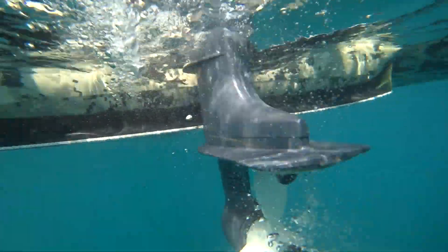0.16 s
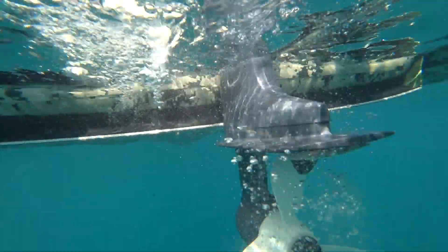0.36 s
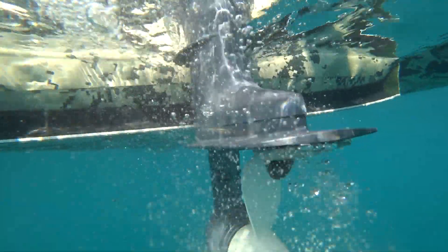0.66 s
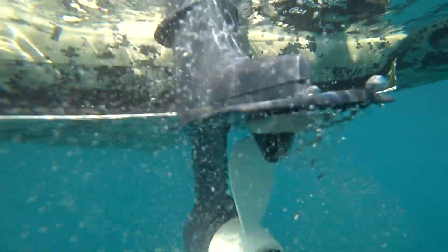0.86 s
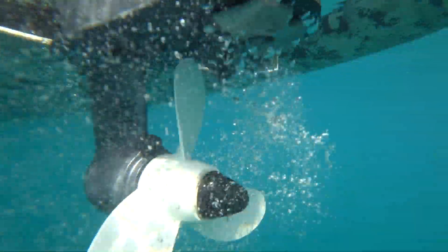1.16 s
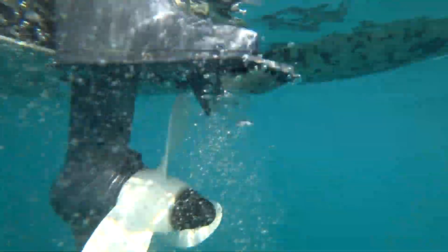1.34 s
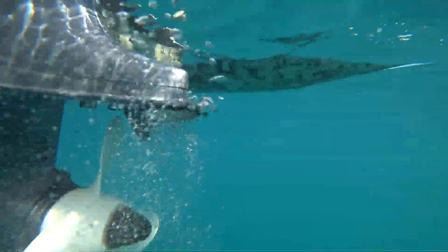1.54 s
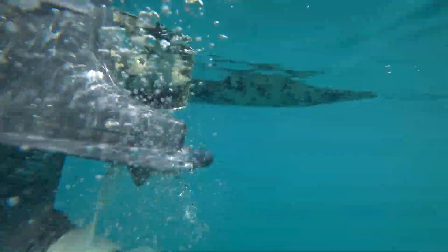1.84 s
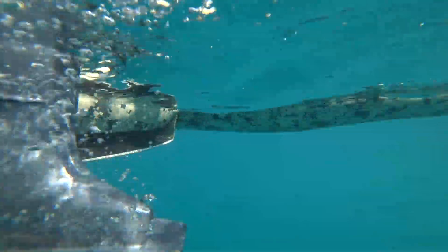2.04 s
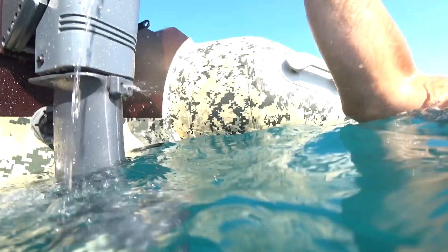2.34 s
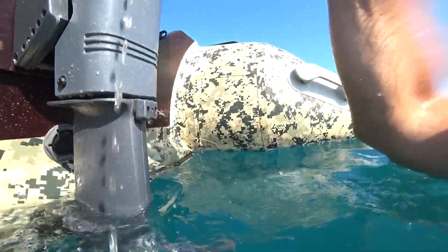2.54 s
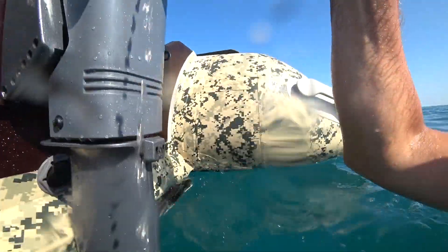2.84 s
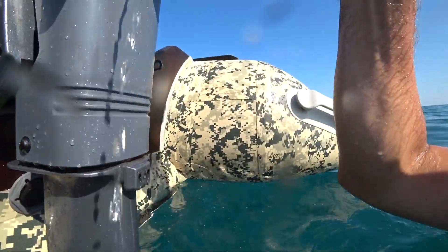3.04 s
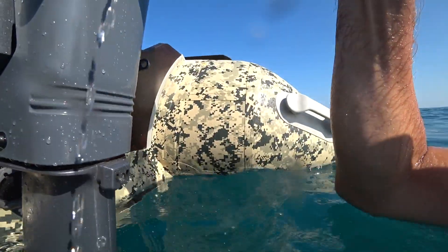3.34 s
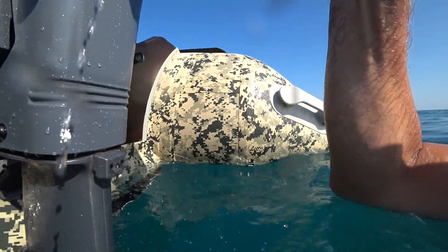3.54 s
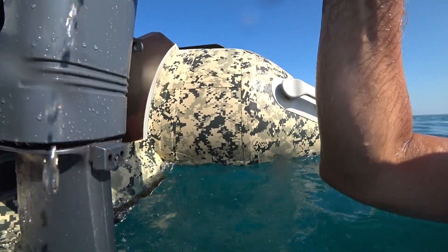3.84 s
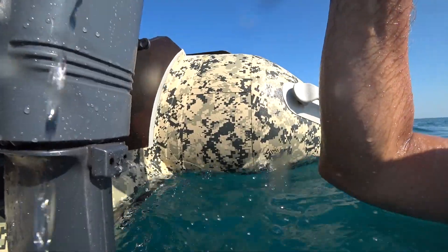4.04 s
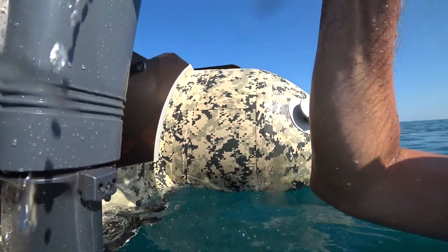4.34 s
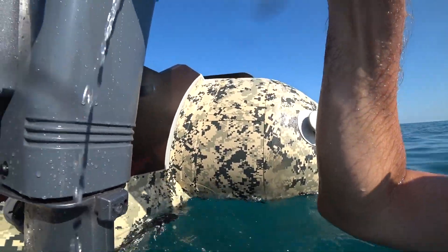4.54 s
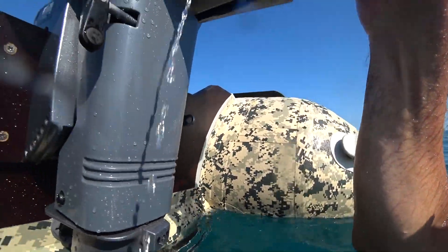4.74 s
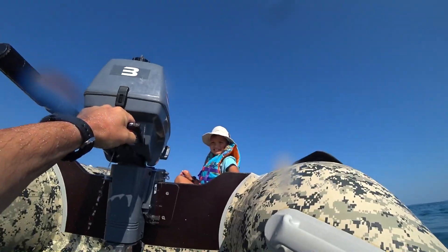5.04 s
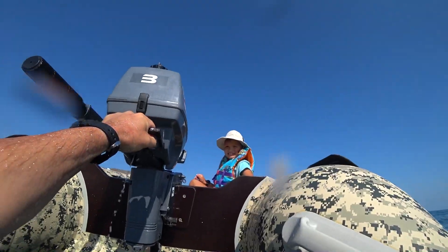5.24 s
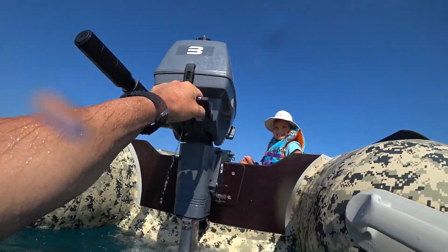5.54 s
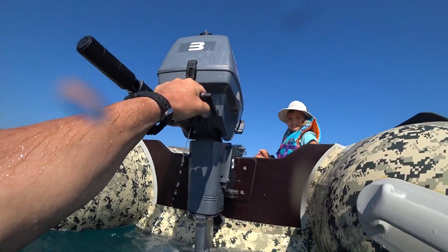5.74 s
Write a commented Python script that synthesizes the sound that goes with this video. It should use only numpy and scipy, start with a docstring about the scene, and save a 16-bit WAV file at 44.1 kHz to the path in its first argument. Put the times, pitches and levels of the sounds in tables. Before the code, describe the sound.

Close to a boat propeller at sea, the idling two-stroke blows loud, ringing, tonal bubbles about twenty times a second, with deep knocks, small ticks and close plips. After about two and a half seconds the microphone rises into open air, hearing crisp clattering metal, gurgling exhaust and light wind rumble. A water drop snaps on the housing just before the engine, now running faster, settles into a buzzing drone.

```python
"""Two-stroke outboard, from under water into the air

A small outboard idles on an inflatable boat, firing about every other turn of the crank. By the propeller
each exhaust puff bursts into ringing bubbles, built from rising sines, over a booming exhaust leg.
Then the microphone surfaces to the dry rattle of the engine, shaped noise pulsed by the firings, and to a
burble at the waterline. At the end the engine runs faster: a drone of crank harmonics, gulps and hiss."""
import sys
import numpy as np
from scipy import signal
from scipy.fft import rfft, irfft, next_fast_len
from scipy.io import wavfile
from scipy.ndimage import uniform_filter1d, map_coordinates

SR = 44100
rng = np.random.default_rng(int(sys.argv[2]) if len(sys.argv) > 2 else 0)


def pcm_store(signal):
    """Save signal as 16-bit PCM."""
    levels = np.round(np.clip(np.atleast_2d(signal), -1, 1) * 32767)
    wavfile.write(sys.argv[1], SR, levels.astype(np.int16).T)


N = 259295
TIME = np.arange(N) / SR
SURFACE_S, FASTER_S = 2.426, 4.8   # the microphone surfaces; the engine runs faster

# the two microphone ports: (f/Hz, left lead/rad, likeness 0-1, left minus right/dB)
PORTS = [(60, 0, .85, -3), (220, .25, .85, -5), (420, .5, .85, -4), (690, .95, .9, -3),
         (850, 1.4, .9, -1.5), (1100, 2.5, .92, 1.5), (3200, 2.7, .65, -.5), (5800, 2, .5, 0),
         (8200, .3, .4, 1.5), (15000, 0, .5, 2.5)]
# exhaust puffs under water, about one a turn: (t/s, length/s, bubble f/Hz, level before each layer's trim/dB)
PUFFS = [(0, 0.01, 555, -18.5), (0.04, 0.013, 936, -21.5), (0.126, 0.027, 743, -20.0),
         (0.207, 0.037, 724, -16.5), (0.257, 0.02, 810, -15.5), (0.315, 0.031, 632, -17),
         (0.366, 0.024, 636, -23), (0.423, 0.038, 625.5, -16.5), (0.469, 0.012, 819, -15.5),
         (0.526, 0.039, 647.5, -14.0), (0.566, 0.019, 799, -15.5), (0.628, 0.034, 613, -17),
         (0.733, 0.019, 925, -12), (0.776, 0.016, 1063, -17.5), (0.833, 0.032, 847, -15.0),
         (0.876, 0.012, 984, -15), (0.937, 0.022, 853, -13), (0.992, 0.016, 801, -12),
         (1.038, 0.031, 600, -11.5), (1.083, 0.013, 812, -14), (1.138, 0.045, 611, -19),
         (1.179, 0.022, 751, -13.5), (1.237, 0.035, 770, -14.5), (1.282, 0.027, 824, -15.5),
         (1.348, 0.031, 638, -15.5), (1.386, 0.0153, 600, -14), (1.441, 0.034, 826, -26),
         (1.494, 0.018, 486, -24), (1.549, 0.06, 816, -26), (1.652, 0.016, 473, -27.5),
         (1.711, 0.04, 480, -19), (1.757, 0.02, 485, -16.0), (1.82, 0.027, 727, -14),
         (1.866, 0.015, 501, -18.5), (1.916, 0.025, 618, -22.5), (1.964, 0.027, 1075, -29),
         (2.022, 0.021, 1050, -21.5), (2.073, 0.029, 695, -24.5), (2.141, 0.032, 876, -23),
         (2.184, 0.02, 662, -25.5), (2.245, 0.044, 902, -28.5), (2.291, 0.036, 985, -37),
         (2.354, 0.043, 957, -33)]
# exhaust welling up at the waterline as the boat rocks: (t/s, level before each layer's trim/dB)
WELLING = [(2.45, -53), (2.56, -34.5), (2.76, -37), (2.86, -43.5), (2.97, -37), (3.17, -30), (3.38, -39),
           (3.49, -49), (3.59, -38.5), (3.69, -37.5), (3.8, -25), (3.9, -34), (4.0, -24), (4.1, -33.5),
           (4.42, -24), (4.52, -32), (4.73, -35.5)]
# hollow colour of the engine and its cowl in air, before tilting: (f/Hz, relative level per Hz/dB)
ENGINE_COLOUR = [(600, 2), (790, -9.5), (1000, 4.5), (1400, -2), (1780, -15), (2020, -6.5), (2250, -15),
                 (2550, -11), (2860, -13.5), (3060, -13.5), (3270, -9.5), (3750, -21), (4200, -13),
                 (5200, -12.5), (7000, -19), (8700, -25.5), (13600, -25.5), (15500, -31)]


def from_db(db):
    """Decibels to gain."""
    return 10 ** (np.asarray(db) / 20)


def rms_one(x):
    """Scale to rms 1."""
    return x / np.sqrt(np.mean(x ** 2) + 1e-20)


def at_s(rows, s):
    """Each column of a curve at the given times."""
    points, *columns = np.transpose(rows)
    return [np.interp(s, points, c) for c in columns]


def in_time(rows):
    """Each column of a curve at every sample."""
    return at_s(rows, TIME)


def at_hz(rows, hz):
    """Each column of a spectrum at the given frequencies, read on a logarithmic scale."""
    points, *columns = np.transpose(rows)
    return [np.interp(np.log(hz + 1e-9), np.log(points), c) for c in columns]


def after(s, fade):
    """A smooth step from 0 to 1, centred on time s."""
    return .5 + .5 * np.tanh((TIME - s) / fade)


def add(out, s, sound):
    """Mix a short sound in at time s."""
    start = max(int(s * SR), 0)
    out[..., start:start + sound.shape[-1]] += sound[..., :N - start]


def low_pass(x, hz, order):
    """Butterworth low-pass."""
    return signal.sosfilt(signal.butter(order, hz, fs=SR, output="sos"), x + 1e-18)


def resonate(x, hz, width_hz):
    """A resonance with gain 1 on top."""
    return signal.lfilter(*signal.iirpeak(hz, hz / width_hz, fs=SR), x + 1e-18)


def with_modes(x, modes):
    """A sound together with the resonances that it excites."""
    return x + sum(from_db(db) * resonate(x, hz, width) for hz, width, db in modes)


def drift(rate):
    """Smooth random wander, some knots per second; rms 1."""
    knots = rng.standard_normal(4096)
    return rms_one(map_coordinates(knots, [TIME * rate], order=2, mode="wrap"))


def at_ports(hz):
    """Complex gain of the left and right port for sounds of these frequencies, each from its own direction."""
    lead, alike, balance_db = at_hz(PORTS, hz)
    scatter = np.sqrt(-2 * np.log(np.clip(alike, .05, 1)))   # less alike: directions spread wider
    lead = lead + scatter * rng.standard_normal(len(hz))
    left = from_db(balance_db / 2) * np.exp(.5j * lead)
    return np.array([left, 1 / left])


def noise(colour):
    """Stereo noise of the given spectrum, falling steeply beyond its ends; rms 1."""
    size = next_fast_len(N, real=True)
    hz = np.arange(size // 2 + 1) * SR / size + 1e-3
    skirts = np.minimum(hz / colour[0][0], 1) ** 4 * np.minimum(colour[-1][0] / hz, 1) ** 4
    gain = from_db(at_hz(colour, hz)[0]) * skirts
    spectrum = rfft(rng.standard_normal(size)) * gain * at_ports(hz)
    return rms_one(irfft(spectrum, size)[:, :N])


def tilted(colour, db_per_octave):
    """A spectrum made brighter or duller."""
    return [(hz, db + db_per_octave * np.log2(hz)) for hz, db in colour]


def wavering(hz, rate, steady, lead):
    """A resonance kept ringing by random pushes, with a steady share; left leads by some radians; rms 1."""
    swing = steady + drift(rate) + 1j * drift(rate)
    phase = 2 * np.pi * np.cumsum(hz * np.ones(N)) / SR
    port_phase = .5 * lead * np.array([[1], [-1]])
    return rms_one((swing * np.exp(1j * (phase + port_phase))).real)


def crank_angle():
    """Turns made by the idling crank so far: its speed summed over time."""
    # idle speed of the crank: (t/s, rate/turns per s)
    crank = [(0, 19.46), (.4, 18.58), (.65, 19.76), (1.2, 19.57), (1.7, 18.93), (2.2, 18.6), (2.8, 19.76),
             (3.3, 19.17), (4.8, 19.4)]
    return np.cumsum(in_time(crank)[0]) / SR


def turns(start, end):
    """Turn times within a span and whether each fires: every other one does, slipping by one at a misfire."""
    misfire_s = 1.6   # one firing fails and the engine catches a turn later
    angle = crank_angle()
    number = np.arange(int(angle[-1]))
    s = np.interp(number, angle, TIME)
    odd_fires = (number % 2 == 1) & (np.roll(s, 1) > misfire_s)
    fires = np.where(s < misfire_s, number % 2 == 0, odd_fires)
    within = (s >= start) & (s < end)
    return s[within], fires[within]


def firings(start, end):
    """The times of the turns that fire."""
    s, fires = turns(start, end)
    return s[fires]


def bubbles(born, hz, sizes, cycles, rise, length):
    """Bubbles swell within a cycle, ring for some cycles and rise in pitch as they near the surface."""
    age = np.maximum(np.arange(int(length * SR)) / SR - born[:, None], 0) * hz[:, None]   # in cycles
    swing = (1 - np.exp(-2 * age)) ** 2 * from_db(-60 * age / cycles)
    phase = 2 * np.pi * age * (1 + rise * age / cycles)
    ports = at_ports(hz) * sizes
    return ports.real @ (swing * np.sin(phase)) + ports.imag @ (swing * np.cos(phase))


def cloud(length, hz, spread, cycles, rise, count):
    """A puff of gas breaks into bubbles one after another; its energy equals 50 ms at rms 1."""
    born = length * (np.arange(count) + rng.random(count)) / count
    pitches = hz * np.exp(spread * rng.uniform(-1.016, 1, count))
    sizes = from_db(rng.normal(0, 2.1, count)) * rng.choice([-1, 1], count)
    sound = bubbles(born, pitches, sizes, cycles, rise, length + cycles / hz)
    return sound * np.sqrt(.05 * SR / np.mean(np.sum(sound ** 2, axis=1)))


def gas_flow(age, length):
    """A puff opens quickly, holds and shuts off."""
    attack_s, release_s = .0035, .005
    return np.minimum(age / attack_s, 1) * np.exp(-np.maximum(age - length, 0) / release_s)


def puff(length, hz, spread, cycles, modes, count):
    """Gas flows evenly and keeps a few bubbles ringing, then shuts off; about rms 1 while it flows."""
    age = TIME[:int((length + .045) * SR)]
    number = np.arange(count)
    born = length * (number + .8 * rng.random(count) * (number > 0)) / count
    pitches = hz * np.exp(spread * rng.permutation(np.linspace(-1, 1, count)))
    signs = rng.choice([-1, 1], count)
    ringing = bubbles(born, pitches, signs, cycles, .05, length + .045)
    sound = with_modes(ringing, modes)
    power = uniform_filter1d(np.mean(sound ** 2, axis=0), size=400)
    return gas_flow(age, length) * sound / np.sqrt(np.abs(power) + 1e-4 * power.max())


def main_bubble(length, hz):
    """The largest bubble of a puff sings while the gas feeds it, climbing in pitch; about rms 1."""
    climb_octaves_per_s, wobble = 4.5, .025   # wobble: spread of the random pitch sway, as a share
    age = TIME[:SR // 10]
    sway, tremor = (np.interp(age * 150, np.arange(20), knots) for knots in rng.standard_normal((2, 20)))
    climb = 2 ** (climb_octaves_per_s * (np.minimum(age, length) - length / 2))
    pitch = hz * climb * (1 + wobble * sway)
    tone = at_ports(np.array([hz])) * np.exp(2j * np.pi * np.cumsum(pitch) / SR)
    return np.sqrt(2) * gas_flow(age, length) * from_db(2 * tremor) * tone.real


def exhaust_bubbles():
    """Each puff blows one singing bubble, lesser ones and a small spray; trapped gas rings on between."""
    # the exhaust leg and its trapped gas resonate under water: (f/Hz, width/Hz, level/dB)
    gas_modes = [(619, 20, 5.5), (825, 120, 10.5), (1107, 30, -7.5)]
    # trapped gas that keeps ringing between the puffs: (t/s, f/Hz, level/dB)
    trapped_gas = [(0, 640, -29.5), (.62, 650, -30.5), (.76, 890, -31), (.91, 815, -26), (1.62, 805, -32),
                   (1.68, 780, -34), (2.3, 700, -35.5)]
    large, spray, fizz = np.zeros((3, 2, N))
    for s, length, hz, db in PUFFS:
        add(large, s, from_db(db - 1.5) * main_bubble(length, hz))
        lesser = puff(length, hz=715.7, spread=0.353, cycles=21.5, modes=gas_modes, count=6)
        add(large, s, from_db(db - 4.5) * lesser)
        spray_gain = from_db(0.3 * db)   # the spray follows the strength of the puff only loosely
        droplets = cloud(length + 0.00548, hz=1276, spread=0.35, cycles=34, rise=0.035, count=7)
        add(spray, s, spray_gain * droplets)
        add(fizz, s, spray_gain * cloud(length, hz=2600, spread=.4, cycles=30, rise=.04, count=9))
    pocket_hz, pocket_db = in_time(trapped_gas)
    ring_on = from_db(pocket_db) * wavering(pocket_hz, rate=55, steady=.8, lead=1.1)
    ring_on = ring_on * (1 - after(SURFACE_S - .1, fade=.05))
    near_surface = from_db(10.1 * after(1.74, fade=0.88))   # small bubbles gather just under the surface
    spray = from_db(-35.5) * near_surface * low_pass(spray, hz=1800, order=6)
    return large + ring_on + spray + from_db(-47.5) * low_pass(fizz, hz=4320, order=4)


def boom():
    """One round knock of the exhaust leg, swelling and sinking a little in pitch; about rms 1 at its height."""
    centre_hz, length_s, sag = 225.5, 0.053, 0.13   # sag: share by which the pitch sinks
    along = TIME[:int(length_s * SR)] / length_s
    hz = centre_hz * (1 + .05 * rng.standard_normal()) * (1 - sag * along)
    swell = np.abs(np.sin(np.pi * along ** 0.82)) ** 1.52
    tone = at_ports(hz[:1]) * np.exp(2j * np.pi * np.cumsum(hz) / SR)
    return np.sqrt(2) * swell * tone.real


def exhaust_pipe():
    """Each firing sets the exhaust leg booming; under water every puff also heaves the gas behind it."""
    # boom of the exhaust leg under water: (t/s, level before trim/dB)
    boom_levels = [(0, -23), (.1, -19), (.21, -18), (.53, -19.5), (.63, -11.5), (.74, -15), (.94, -12.5),
                   (1.14, -15.5), (1.24, -18.5), (1.34, -15.5), (1.55, -25), (1.71, -15.5), (1.82, -15.5),
                   (1.92, -25), (2.03, -30), (2.14, -27), (2.35, -39)]
    in_air_db = -12.5   # against the welling
    knocks, thump = np.zeros((2, 2, N))
    for s in firings(0, FASTER_S):
        db = at_s(boom_levels, s)[0] if s < SURFACE_S else at_s(WELLING, s)[0] + in_air_db
        add(knocks, s - .002, from_db(db - 5.5) * boom())
    for s, length, _, db in PUFFS:
        heave = cloud(length, hz=236.0, spread=0.3, cycles=12, rise=0.014, count=4)
        add(knocks, s + 0.0015, from_db(db - 16.5) * heave)
        low = cloud(length, hz=96.8, spread=0.32, cycles=3.1, rise=.02, count=3)
        add(thump, s + 0.0036, from_db(db - 15.0) * low)
        deep = cloud(length / 2, hz=40, spread=.3, cycles=2.5, rise=0, count=1)
        add(thump, s, from_db(db - 15) * deep)
    # the leg holds on to its own note between firings
    held = from_db(-2.5) * resonate(knocks, hz=225.0, width_hz=22)
    return knocks + held + low_pass(thump, hz=170, order=4)


def churned_water():
    """Random noise of churned water, its low slosh and a steady hiss, with a hum of the housing."""
    # churned water: (t/s, level before each layer's trim/dB)
    churn_levels = [(0, -34), (.5, -30), (1.25, -27), (1.65, -32), (2.05, -30.5), (2.3, -33.5), (2.45, -40)]
    # colour of the churn: (f/Hz, relative level per Hz/dB)
    churn_colour = [(330, -12.5), (480, -3.5), (800, 3), (1000, 2), (1150, 1), (1340, -9), (1600, -12.5),
                    (2200, -22.5), (3200, -39), (4700, -47), (5700, -33), (7000, -67)]
    # low slosh of the water around the housing: (f/Hz, relative level per Hz/dB)
    slosh_colour = [(18, 11.5), (36, -4), (60, -4), (118, 2), (150, -7), (200, 9.5), (260, -10), (400, 1)]
    churn_db, = in_time(churn_levels)
    churn = from_db(churn_db - 4 + 3.5 * drift(60)) * noise(churn_colour)
    slosh = from_db(churn_db - 2.0) * noise(slosh_colour)
    housing_hum = from_db(churn_db - 3.0) * wavering(485, rate=60, steady=0, lead=2.41)
    sea_hiss = from_db(-59.5) * noise([(3000, 10.0), (5700, -7.5), (7000, -10.0), (15500, -14.0)])
    return churn + slosh + housing_hum + sea_hiss


def piston_rattle(colour, attack, decay, second_s, second_db):
    """Each firing shakes the metalwork as a noise burst; a weaker, uneven rattle follows later in the cycle."""
    # piston rattle: (t/s, level before random force and layer trim/dB)
    rattle_levels = [(0, -52), (.45, -61.5), (1.3, -58.5), (1.6, -66), (2.24, -63), (2.48, -52.5),
                     (4.3, -50), (4.73, -53.5)]
    age, envelope = TIME[:SR // 8], np.zeros(N)
    times = firings(0, FASTER_S)[1:]
    for s, (force, damping, late, strength) in zip(times, rng.standard_normal((len(times), 4))):
        db = at_s(rattle_levels, s)[0] + 2.2 * force
        shake = (1 - np.exp(-age / attack)) * np.exp(-age / (decay * from_db(1.2 * damping)))
        shake = shake / shake.max()
        add(envelope, s - .001, from_db(db) * shake)
        add(envelope, s + second_s + 0.01 * late, from_db(db + second_db + 2.5 * strength) * shake)
    return envelope * noise(colour) * from_db(2.4 * drift(700))


def wet_rattle():
    """The piston rattle as heard through the water: short bursts of duller noise."""
    # colour under water: (f/Hz, relative level per Hz/dB)
    wet_colour = [(3000, 12.5), (4800, 0.5), (5700, 2.5), (7200, -7.5), (11000, -10), (15500, -19)]
    return from_db(12.5) * piston_rattle(
        wet_colour, attack=0.004, decay=0.0064, second_s=0.045, second_db=-10.5)


def housing():
    """Drops snap on the housing and ring it in air; under water its ticks are damped to dry cracks."""
    # sharp ticks on the microphone housing under water: (t/s, level before trim and colour/dB)
    tick_rows = [(.5705, -35), (0.7385, -33), (0.88, -31), (0.9523, -34), (1.086, -24.5), (1.238, -36)]
    # drops in air: (t/s, ring level/dB, snap level/dB, low-pass f/Hz, left lead/rad)
    drop_rows = [(3.2092, -21.5, -48, 1900, 1.5), (4.9974, -18, -19, 8000, 2.2)]
    # the housing rings with: (f/Hz, level against the drop's ring/dB, t60/s)
    housing_modes = [(600, -13, .012), (1060, 0, .028), (1280, -6, .018), (1550, -10, .012),
                     (2010, -6, .027), (3250, -13, .014), (3700, -17, .01)]
    snaps, ticks, out = np.zeros(N), np.zeros(N), np.zeros((2, N))
    age = TIME[:SR // 20]
    for s, db, snap_db, bright_hz, lead in drop_rows:
        add(snaps, s, from_db(snap_db) * np.exp(-age / .0018))
        ports = np.exp(.5j * lead * np.array([[1], [-1]]))
        for k, (hz, mode_db, t60) in enumerate(housing_modes):
            swing = (1 - np.exp(-age / .0004)) * from_db(db + mode_db - 60 * age / t60)
            ring = swing * np.exp(2j * np.pi * hz * age)
            # neighbouring modes start in opposite directions
            add(out, s, (-1) ** k * low_pass((ports * ring).imag, bright_hz, order=4))
    for s, db in tick_rows:
        add(ticks, s, from_db(db + 1) * np.exp(-age / .0005))
    for s in rng.uniform(0, SURFACE_S, 40):   # tiny bubbles burst against it at random
        add(ticks, s, from_db(-46 + 4 * rng.standard_normal()) * np.exp(-age / .0005))
    crack = noise([(1200, -1.5), (3000, 12.5), (6000, -9.5), (15000, -27.5)])
    snap = noise([(900, 20.0), (2400, 12), (3400, -3), (4500, -9), (6000, -11), (12000, -27)])
    return out + ticks * crack + snaps * snap


def gear_clinks():
    """Under water each firing ticks in the gears with a short cluster of high partials, different every time."""
    out = np.zeros((2, N))
    for s in firings(0, SURFACE_S)[1:]:
        db = -67 + 1.7 * rng.standard_normal()
        add(out, s, from_db(db) * cloud(.011, hz=10000, spread=.22, cycles=110, rise=0, count=12))
    return out


def plips():
    """Lone bubbles ring briefly next to the microphone as decaying sines, rising in pitch."""
    # single bubbles close by: (t/s, starting f/Hz, level before decay/dB, ring length to -60 dB/cycles)
    plip_rows = [(0.149, 1500, -18.5, 40), (0.163, 109, 4, 4.9), (0.225, 1115, -10, 43),
                 (0.579, 1450, -21.5, 140), (0.681, 441, 0, 20), (0.768, 2360, -18, 53),
                 (0.865, 48, -19, 3.7), (0.993, 1496, -12, 45), (1.298, 1165, -7.5, 33),
                 (1.321, 2570, -22, 30), (1.383, 1800, -14, 27), (1.431, 1930, -20.5, 27),
                 (2.059, 1400, -22, 83), (2.082, 2410, -22, 62), (2.326, 1416, -13, 35),
                 (2.37, 1360, -15, 39), (2.404, 1140, -9, 26), (2.411, 1340, -17, 57),
                 (2.466, 1126, -6.5, 22), (2.51, 1227, -10.5, 27), (2.579, 1420, -16, 12),
                 (3.912, 296, -27, 44), (3.958, 420, -15, 8.4), (4.364, 557, -29, 34)]
    rise, wobble = .08, .7   # pitch climbs by twice the rise along the ring; spread of the phase wobble/rad
    out = np.zeros((2, N))
    for s, hz, db, cycles in plip_rows:
        age = TIME[:SR // 10] * hz   # in cycles
        swing = (1 - np.exp(-1.3 * age)) ** 2 * from_db(db - 60 * age / cycles)
        shape = wobble * rng.standard_normal() * np.sin(age + 2 * np.pi * rng.random())
        phase = 2 * np.pi * age * (1 + rise * age / cycles) + shape
        port_phase = .5 * at_hz(PORTS, hz)[0] * np.array([[1], [-1]])
        add(out, s, swing * np.sin(phase + port_phase))
    return out


def waterline():
    """Heard from the air, each firing wells up in fat bubbles that ring a gas pocket; smaller ones splutter."""
    delay_s, burble_s = 0.0141, .052   # delay after each firing; length of the flow
    fat, small = np.zeros((2, 2, N))
    for s in firings(SURFACE_S, FASTER_S):
        gain = from_db(at_s(WELLING, s)[0])
        fat_cloud = cloud(burble_s, hz=364.7, spread=0.089, cycles=38.0, rise=0.0078, count=6)
        small_cloud = cloud(burble_s, hz=429.3, spread=0.573, cycles=34.0, rise=0.048, count=6)
        add(fat, s + delay_s, gain * fat_cloud)
        add(small, s + delay_s, gain * small_cloud)
    simmer = wavering(377, rate=35, steady=0, lead=1.0)
    idling = after(SURFACE_S + 0.073, fade=0.021) - after(FASTER_S, fade=.02)
    pocket = resonate(fat, hz=374.0, width_hz=11.6)
    splutter = from_db(-17.5) * low_pass(small, hz=690, order=4)
    return from_db(-8.5) * fat + from_db(-1.0) * pocket + splutter + from_db(-50.5) * idling * simmer


def dry_rattle():
    """The piston rattle in air: noise bursts ring the metalwork, with the sharp edge of each knock on top."""
    # colour in air: (f/Hz, relative level per Hz/dB)
    dry_colour = [(4100, 5), (4800, 2), (5900, 7.5), (7000, 3), (8400, -12), (11500, -28), (15500, -33)]
    # the engine's metalwork rings with: (f/Hz, width/Hz, level/dB)
    metal_modes = [(4780, 50, 13.5), (5240, 72, 11), (5890, 110, 2)]
    # the sharp edge of each piston knock: (f/Hz, relative level per Hz/dB)
    knock_colour = [(4200, -5), (6000, -4.5), (9000, -5.5), (13500, -6.5), (15500, -18)]
    shaken = piston_rattle(dry_colour, attack=0.0044, decay=0.015, second_s=0.074, second_db=-4.0)
    knock = piston_rattle(knock_colour, attack=0.0045, decay=0.0069, second_s=0.07, second_db=-36)
    return from_db(-2.5) * with_modes(shaken, metal_modes) + from_db(1.0) * knock


def idle_clatter():
    """The piston knocks at both ends of its travel: noise pulses gently, twice to a turn of the crank."""
    since_knock = (2 * np.interp(TIME - .009, TIME, crank_angle())) % 1   # in half turns
    knocks = 0.5 + 0.52 * np.exp(-since_knock / 1.1)
    clatter = noise(tilted(ENGINE_COLOUR, db_per_octave=-0.44))
    return from_db(-47.5) * knocks * clatter * from_db(2.83 * drift(90))


def port_rumble():
    """Wind and swell on the microphone ports, as low noise of changing level."""
    # wind and swell: (t/s, level before trim/dB)
    rumble_levels = [(2.4, -35.5), (2.7, -53.5), (3.02, -48.5), (3.4, -52), (4.5, -51), (4.75, -45.5),
                     (5.0, -41.5), (5.3, -45.5), (5.88, -50)]
    # colour of the rumble: (f/Hz, relative level per Hz/dB)
    rumble_colour = [(15, -11), (32, 10), (55, 0), (80, -6.5), (118, -1.5), (150, -13), (300, -7)]
    return from_db(in_time(rumble_levels)[0] + 4.5) * noise(rumble_colour)


def running():
    """Firings merge to a rough drone; every other turn gulps at the waterline, the metallic hiss throbs."""
    # running faster: (t/s, drone level before trim/dB, hiss level before trim/dB)
    run_levels = [(4.8, -36, -52), (5.0, -38.5, -51.5), (5.27, -42, -52.5), (5.6, -33, -51),
                  (5.88, -30, -52.5)]
    # exhaust drone: (multiple of the crank rate, level against the drone/dB)
    drone_partials = [(2, -11), (3, -14), (4, -5), (5, -3.5), (6, -11), (7, -4.5), (8, -2), (9, -18)]
    # the waterline burble at speed: (t/s, f/Hz, level before each layer's trim/dB)
    burble_rows = [(4.8, 423, -34.5), (4.86, 406, -22.5), (4.9, 460, -33), (4.97, 477, -23),
                   (5.035, 406, -35.5), (5.065, 413, -19), (5.17, 434, -17.5), (5.23, 443, -25.5),
                   (5.29, 500, -28.5), (5.34, 493, -22.5), (5.4, 413, -33), (5.45, 434, -26.5),
                   (5.58, 401, -35), (5.69, 428, -24.5), (5.735, 435, -20), (5.78, 390, -23.5),
                   (5.82, 388, -21), (5.88, 389.2, -43)]
    # froth of the burble: (f/Hz, relative level per Hz/dB)
    froth_colour = [(200, -40), (330, -27), (390, -18), (440, 10), (480, -44), (530, -41), (700, -17)]
    crank_hz = 53.1
    drone_db, hiss_db = in_time(run_levels)
    phase = 2 * np.pi * np.cumsum(crank_hz * (1 + 0.0072 * drift(14))) / SR
    drone, gulps = np.zeros((2, 2, N))
    for k, db in drone_partials:
        partial_phase = k * phase + 2 * np.pi * rng.random() + 0.096 * drift(60)
        tone = at_ports(np.array([k * crank_hz])) * np.exp(1j * partial_phase)
        drone += from_db(drone_db + db + 2.5 * drift(25)) * np.sqrt(2) * tone.real
    growl_noise = noise([(90, -17), (200, -1), (340, -4), (400, -20)])
    growl = from_db(drone_db - 8) * growl_noise * (1 + np.cos(phase))
    for s in np.arange(FASTER_S + .004, TIME[-1], 2 / crank_hz):
        hz, db = at_s(burble_rows, s + 0.02)
        late, sharp = rng.standard_normal(2)
        gulp_hz = hz * (1 + 0.017 * sharp)
        gulp = puff(length=0.027, hz=gulp_hz, spread=0.029, cycles=78, modes=[], count=3)
        add(gulps, s + 0.00302 * late, from_db(db) * gulp)
    pocket = from_db(-5) * resonate(gulps, hz=422, width_hz=14)
    burble = low_pass(from_db(-2.5) * gulps + pocket, hz=505, order=12)
    burble_db = in_time(burble_rows)[1]
    froth = from_db(burble_db - 11.5) * noise(froth_colour)
    # the burble shakes the housing
    hollow = from_db(burble_db - 19) * wavering(590, rate=150, steady=0, lead=3.2)
    grain = from_db(2.5 * drift(900) + 1.5 * drift(110))
    hiss = from_db(hiss_db + 6.5) * noise(tilted(ENGINE_COLOUR, db_per_octave=-0.34))
    hiss = hiss * (1 + 0.096 * np.cos(phase)) * grain
    whine = from_db(-56) * wavering(2760 + 9 * drift(20), rate=50, steady=1.2, lead=2.4)
    chatter = from_db(-65.5) * wavering(3270, rate=140, steady=0, lead=3) * (1 + np.cos(phase))
    return drone + growl + burble + froth + hollow + hiss + whine + chatter


def scene():
    """Under water, then in air at idle, then at speed."""
    in_air, faster = after(SURFACE_S, fade=0.11), after(FASTER_S, fade=0.0091)
    exhaust = exhaust_bubbles() + exhaust_pipe() + waterline()
    water = churned_water() + wet_rattle()
    idle = dry_rattle() + idle_clatter()
    air = (1 - faster) * idle + faster * running() + port_rumble()
    close_by = plips() + housing() + gear_clinks()
    return exhaust + close_by + (1 - in_air) * water + in_air * air


def record(dry):
    """Peaks are rounded towards a ceiling of 0.95, then a steep low-pass cuts the top."""
    cutoff_hz = 15800
    rounded = dry / (1 + (dry / .95) ** 8) ** (1 / 8)
    return signal.sosfilt(signal.ellip(10, .1, 90, cutoff_hz, fs=SR, output="sos"), rounded)


dry = scene()
out = record(dry)
pcm_store(out)
```